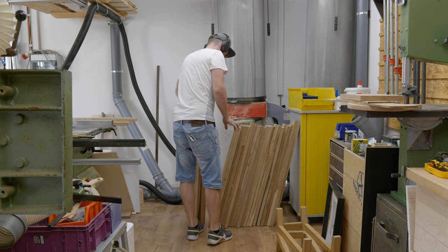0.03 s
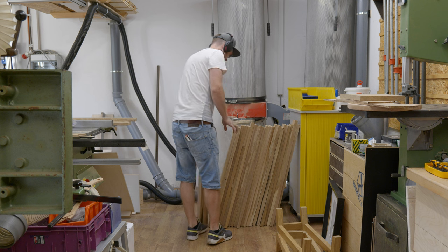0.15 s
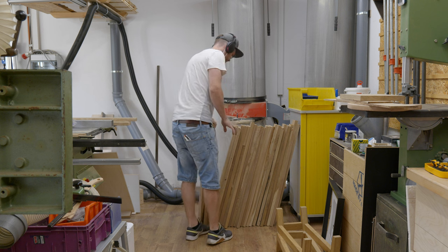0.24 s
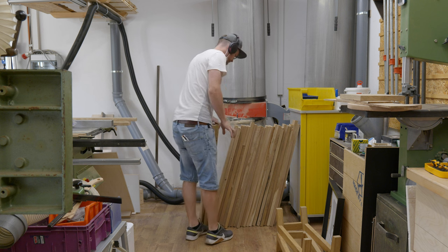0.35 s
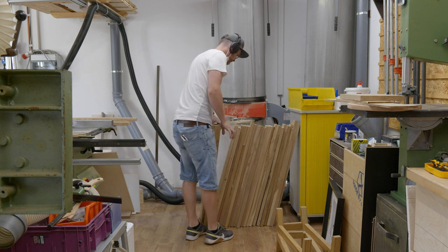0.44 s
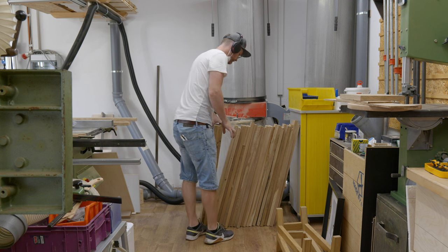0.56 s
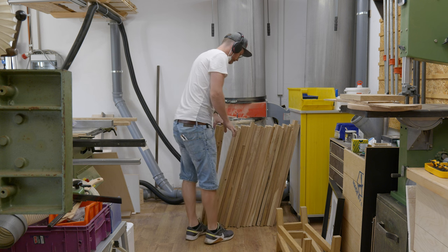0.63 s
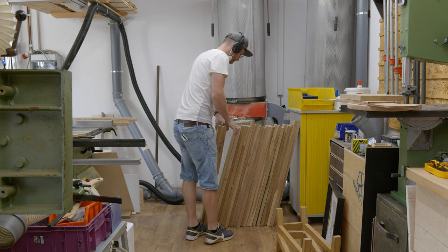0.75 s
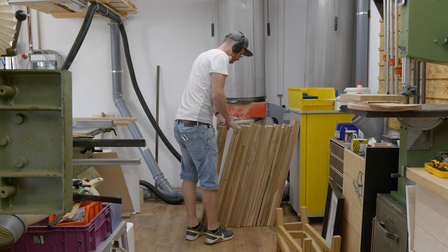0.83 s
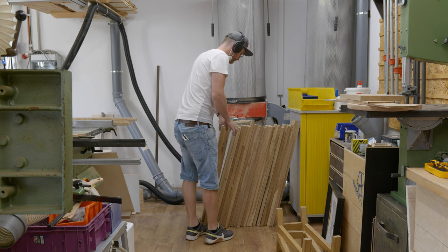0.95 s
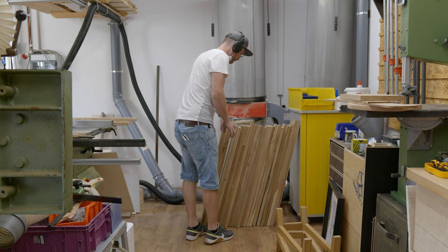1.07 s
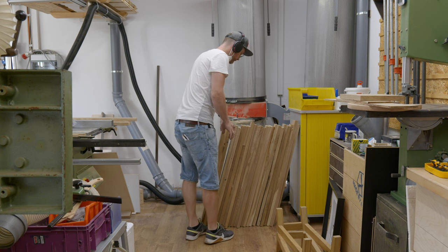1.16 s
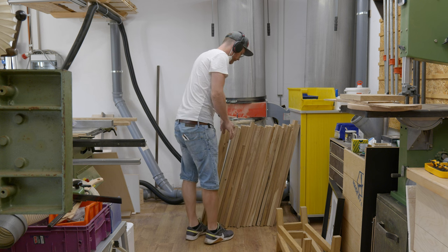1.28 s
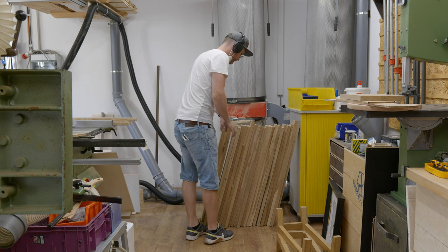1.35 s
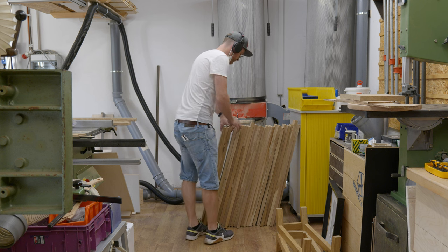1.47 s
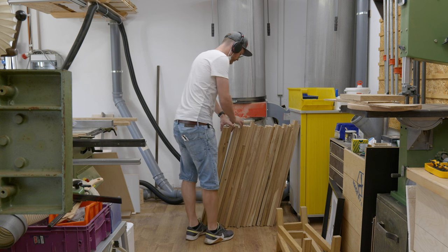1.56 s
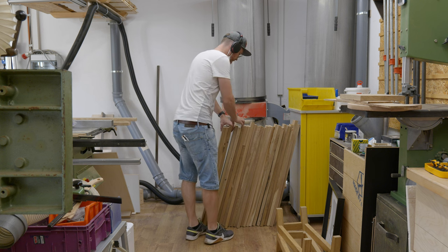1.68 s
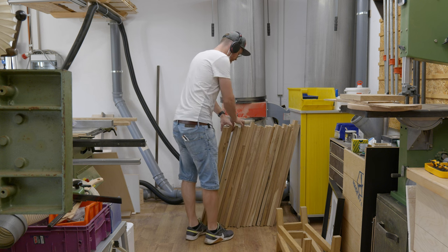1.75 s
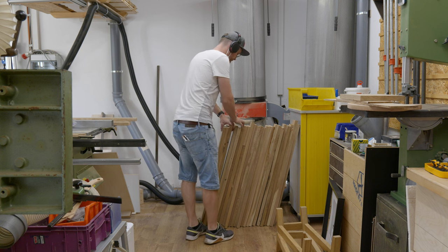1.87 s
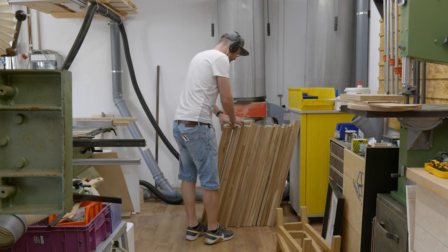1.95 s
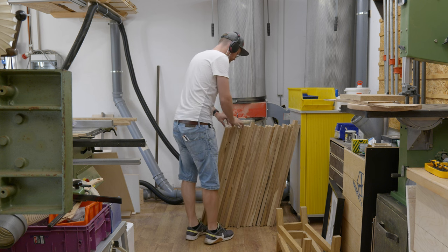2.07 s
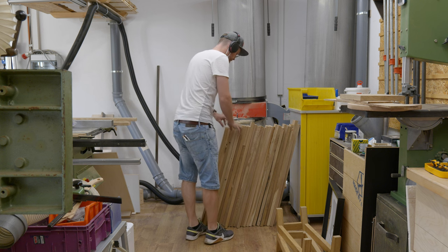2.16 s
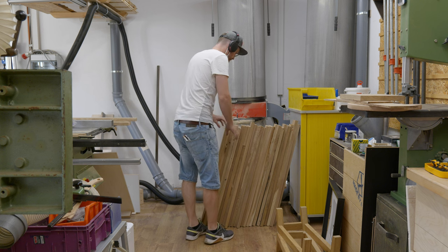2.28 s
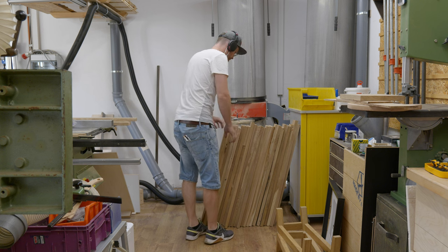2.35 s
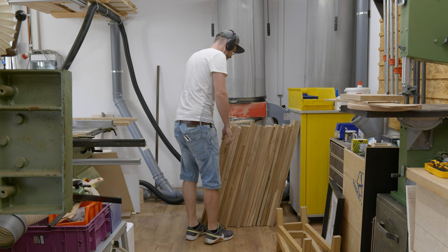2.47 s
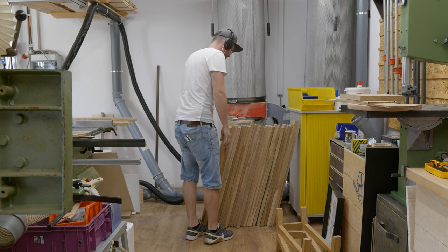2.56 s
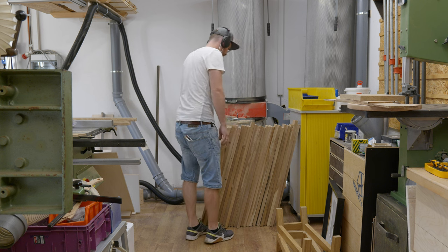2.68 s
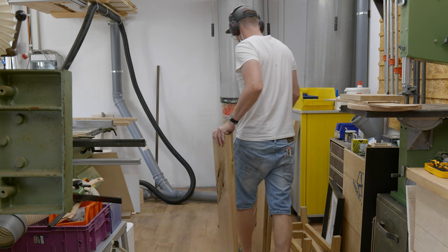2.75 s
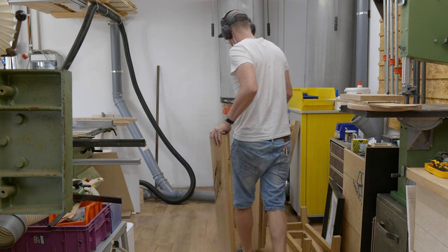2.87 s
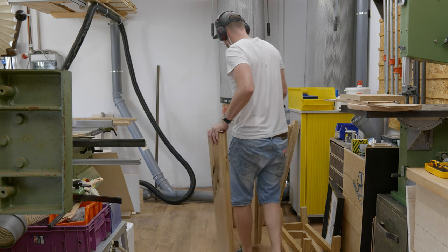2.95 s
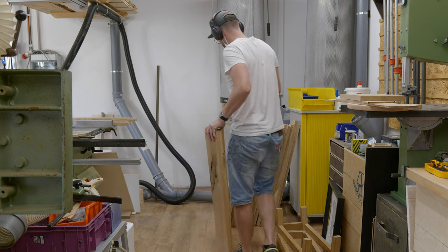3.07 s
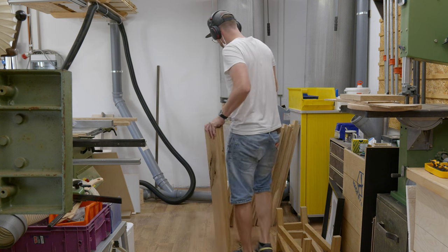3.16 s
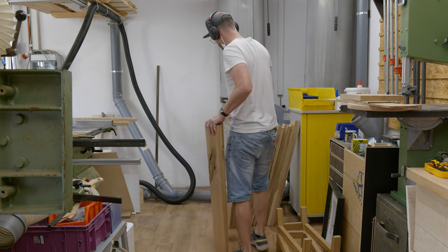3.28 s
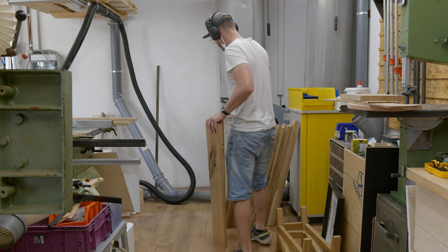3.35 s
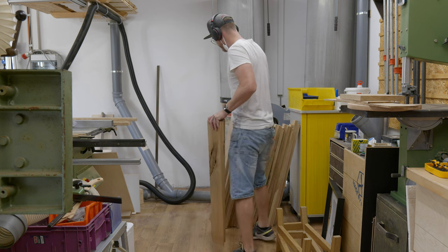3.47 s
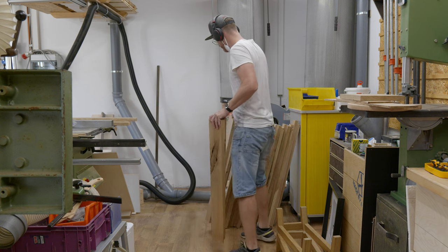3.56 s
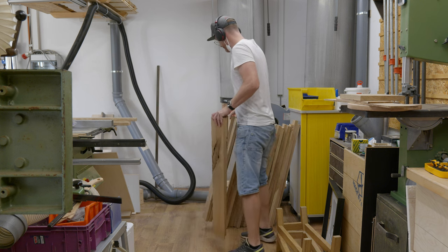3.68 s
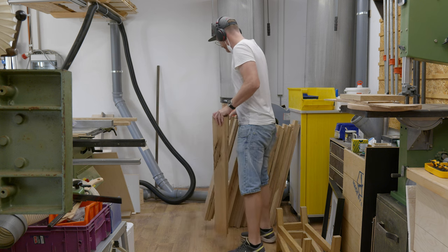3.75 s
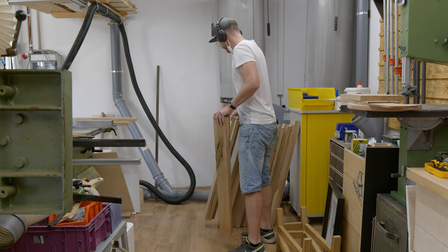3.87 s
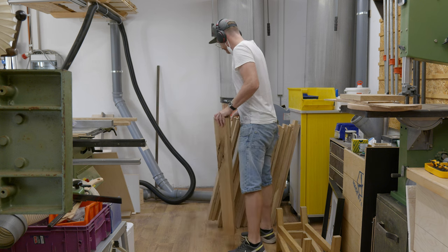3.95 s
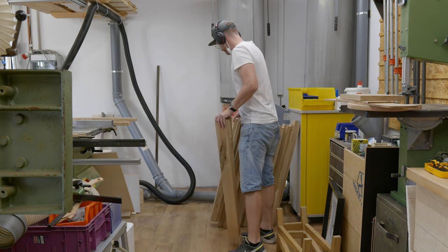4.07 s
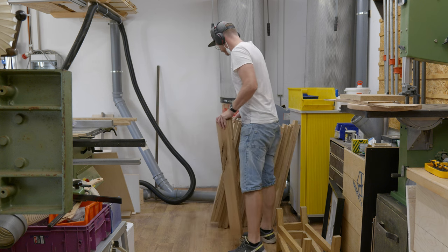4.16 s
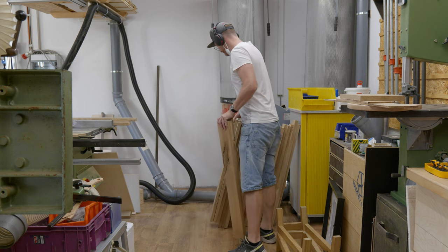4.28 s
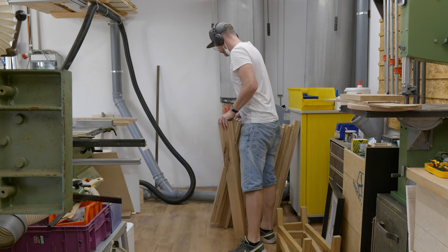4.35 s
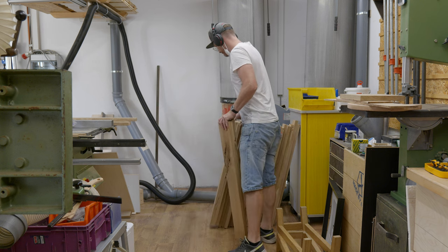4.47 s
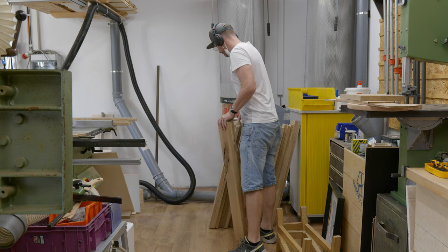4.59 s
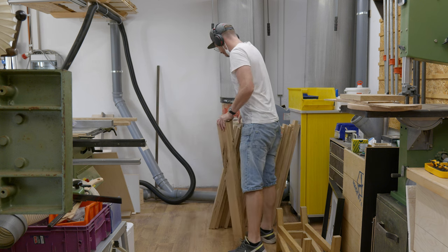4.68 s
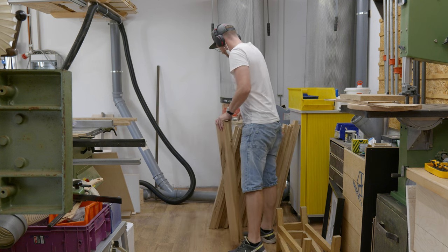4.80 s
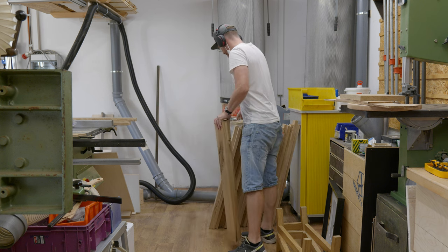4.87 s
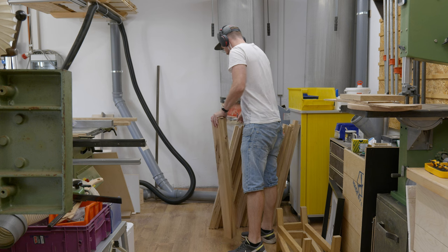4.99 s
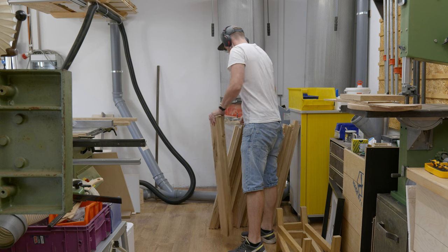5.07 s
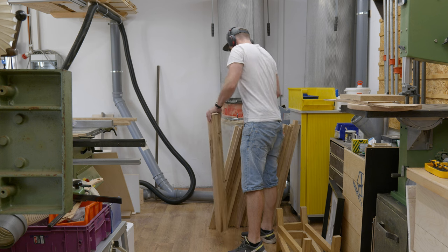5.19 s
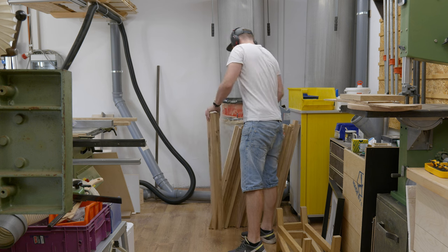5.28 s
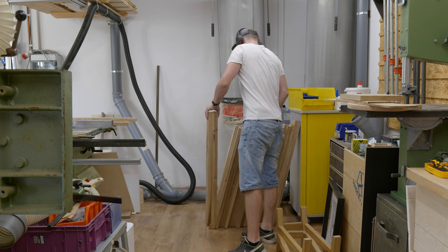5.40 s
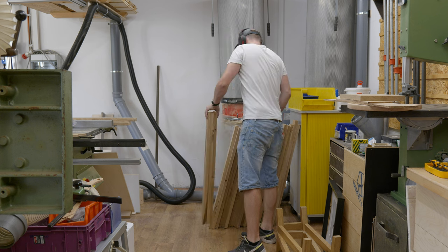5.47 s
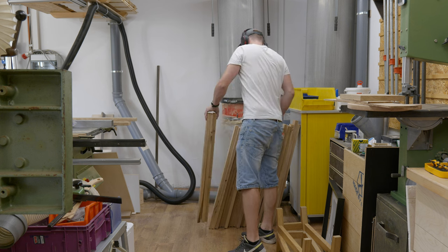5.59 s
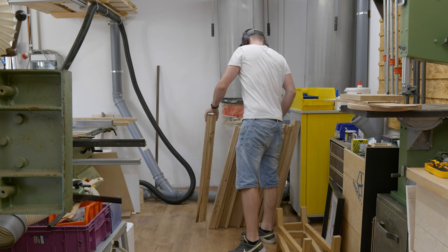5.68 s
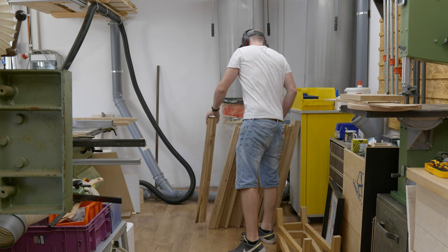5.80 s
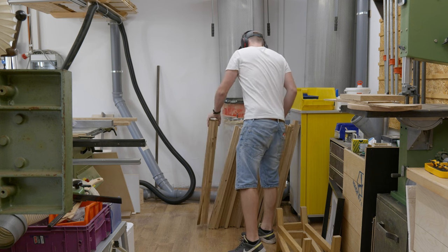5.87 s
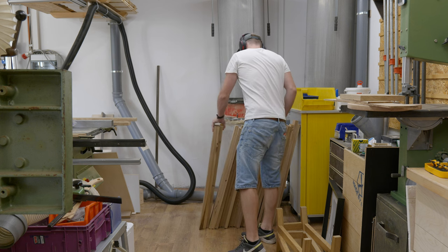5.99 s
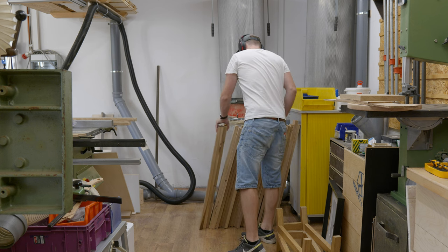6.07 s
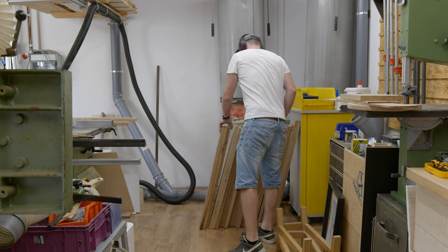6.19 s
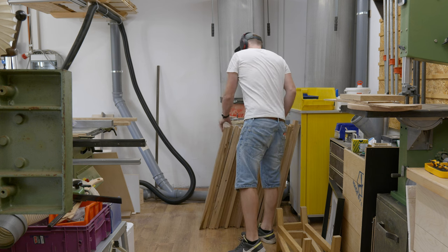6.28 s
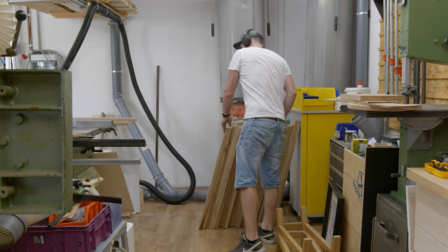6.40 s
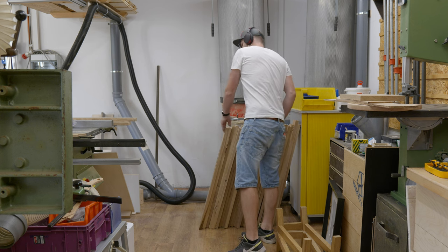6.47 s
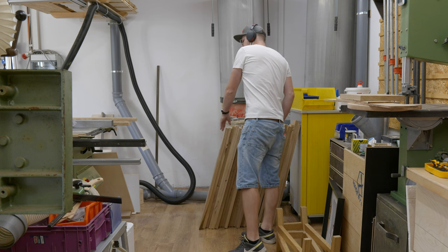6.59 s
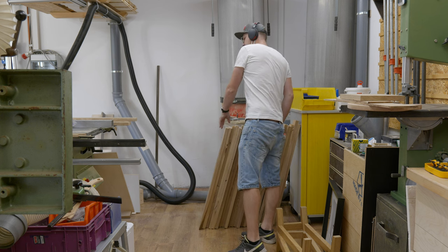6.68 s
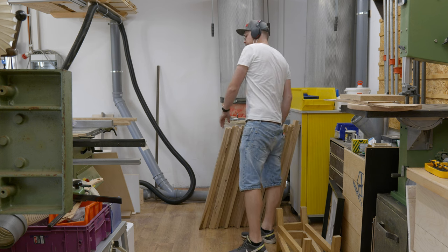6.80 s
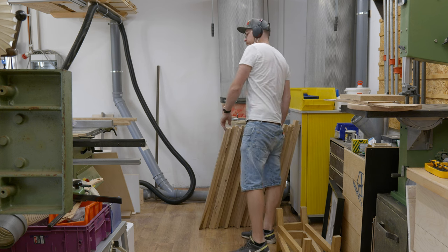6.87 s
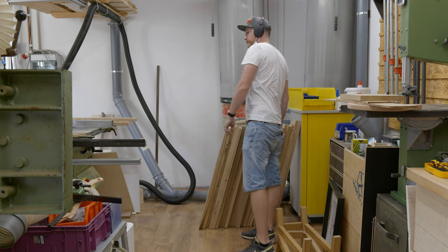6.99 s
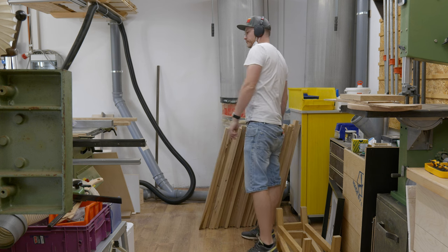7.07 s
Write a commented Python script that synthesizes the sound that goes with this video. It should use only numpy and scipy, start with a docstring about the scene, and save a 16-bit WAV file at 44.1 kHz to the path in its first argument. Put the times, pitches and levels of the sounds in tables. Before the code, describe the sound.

Wooden slats slide and knock as a stack is sorted by hand, building to loud sharp clatter in an echoing, hard-walled workshop.

```python
"""A hard-walled workshop, one microphone some metres from a stack of wooden slats being sorted by hand.
Over steady noise the slats slide from the start: tiny catches of the grain make a dry hiss. Sparse knocks
follow, ringing the slats and booming the plank floor; before 2 s the first stick-slip squeak sounds.
The knocks crowd together from 4 to 5 s, the loudest overloading the recorder; faint taps follow, then a last
loud group just after 6 s. Slides, knocks and squeaks are all drawn out by the room's dense tail."""
import sys
import numpy as np
from scipy import signal
from scipy.fft import rfft, irfft
from scipy.io import wavfile
from scipy.ndimage import uniform_filter1d

SR = 44100
rng = np.random.default_rng(int(sys.argv[2]) if len(sys.argv) > 2 else 0)


def store_pcm(level_fs):
    """Save levels as 16-bit WAV."""
    pcm = np.round(np.clip(level_fs, -1, 1) * 32767).astype(np.int16)
    wavfile.write(sys.argv[1], SR, np.atleast_2d(pcm).T)


N = 314853   # samples in the scene


def from_db(db):
    """Decibels to gain."""
    return 10 ** (np.asarray(db) / 20)


def rms_one(x):
    """Scale to rms 1."""
    return x / np.sqrt(np.mean(x ** 2) + 1e-20)


def at_hz(hz, points_hz, values):
    """Read a value between points on a log-frequency axis."""
    return np.interp(np.log(hz), np.log(points_hz), values)


def band(x, low_hz, high_hz):
    """Butterworth band-pass."""
    sos = signal.butter(2, [low_hz, high_hz], "band", fs=SR, output="sos")
    return signal.sosfilt(sos, x)


def ring(clicks, hz, t60):
    """A unit click sets a decaying sine of starting height 1 ringing; t60 is its time to fall 60 dB."""
    r = from_db(-60 / (t60 * SR))
    w = 2 * np.pi * hz / SR
    # the tiny offset keeps the filter from running into vanishing numbers
    return signal.lfilter([0, np.sin(w)], [1, -2 * r * np.cos(w), r * r], clicks + 1e-18)


# spectrum of the room and microphone noise: pitch_hz, level_db (per Hz, relative)
QUIET_SPECTRUM = [(15, -29), (25, 4.5), (49, 2), (153, 1), (427, -4), (591, -2.5), (659, -9.5), (863, -9.5),
                  (2350, -13), (3340, -11.5), (6380, -21), (14800, -23.5), (16000, -37)]
QUIET_DB = -62.5   # rms of the noise


def quiet():
    """Steady noise of the room and the microphone: white noise shaped in frequency."""
    hz = np.maximum(np.arange(N // 2 + 1) * SR / N, 1)
    shape = from_db(at_hz(hz, *np.transpose(QUIET_SPECTRUM)))
    noise = irfft(rfft(rng.standard_normal(N)) * shape, N)
    return from_db(QUIET_DB) * rms_one(noise)


# wood and soles sliding, one stroke a row: start_s (of full pressure), rise_s, hold_s, fall_s,
# rasp_db, body_db (over rasp), hiss_db (over rasp)
SLIDE_STROKES = [(0.0, .05, .17, .1, -57, -2, -24), (0.219, 0.083, .06, .1, -47.5, -3.5, -10),
                 (0.33, 0.045, .26, .08, -55.5, -8, -11), (0.897, 0.076, .07, .02, -70, -2, -26),
                 (1.825, 0.043, .02, .08, -63, -0.5, -30), (2.052, 0.3, .08, .03, -65, -4.5, -20),
                 (2.744, 0.068, .04, .02, -71, -2, -16), (2.827, 0.019, .04, .05, -40.5, -17, -9),
                 (2.9, .02, .08, .15, -56, -4, -14), (3.298, 0.046, .02, .1, -62, -3.5, -13),
                 (3.454, .04, .03, .2, -64, 0.5, -3), (3.586, 0.16, .04, .33, -46.5, -9, -17),
                 (4.44, .05, .02, .1, -66, 10.5, -17), (4.592, 0.13, .02, .01, -51, -1, -25.5),
                 (5.767, .05, .03, .25, -66, -19, -25), (6.397, .01, 0.018, 0.033, -55.5, -12, -1.5),
                 (6.783, 0.19, .05, .08, -70, -2.5, -21)]
STROKE_RANGE_DB = 20   # rise and fall are timed over this range
JUDDER_DB = 1.2   # rms: the contact grips and slips unevenly
FIDGET_DB = (-86, -78.5, -90)   # hands and slats never rest: rasp, body, hiss
FIDGET_SWING_DB, FIDGET_SMOOTH_S = 3, .04   # rms swing, averaging time


def pressure():
    """Rasp, body and hiss in time: the strokes rise, hold and fall over a faint restless background."""
    step_s = .002
    t = np.arange(0, N / SR + step_s, step_s)
    restless = uniform_filter1d(rng.standard_normal(len(t)), size=round(FIDGET_SMOOTH_S / step_s))
    fidget_db = np.add.outer(FIDGET_DB, FIDGET_SWING_DB * rms_one(restless))
    power = from_db(fidget_db) ** 2
    for s, rise, hold, fall, rasp_db, body_db, hiss_db in SLIDE_STROKES:
        before = np.maximum((s - t) / rise, 0)
        after = np.maximum((t - s - hold) / fall, 0)
        drop_db = STROKE_RANGE_DB * np.minimum(before + after, 8)
        power += from_db(rasp_db + np.c_[[0, body_db, hiss_db]] - drop_db) ** 2
    uneven = uniform_filter1d(rng.standard_normal(len(t)), size=8)
    judder = from_db(JUDDER_DB * rms_one(uneven))
    return [np.interp(np.arange(N) / SR, t, np.sqrt(row) * judder) for row in power]


def slides():
    """Dense tiny catches of the grain, heard in a low, a middle and a high range."""
    rasp, body, hiss = pressure()
    height = from_db(3.3 * rng.exponential(1, (3, N)))
    sign = rng.choice([-1, 1], (3, N))
    caught = rng.random((3, N)) < .2   # one sample in five
    catches = height * sign * caught
    # the rasp is lifted where the slats ring most freely
    middle = rms_one(band(catches[0], 1300, 5200)) + 0.25 * rms_one(band(catches[0], 3000, 3900))
    low = band(catches[1], 130, 1100)
    high = band(catches[2], 5400, 16000)
    return rasp * rms_one(middle) + body * rms_one(low) + hiss * rms_one(high)


# how long the workshop rings: pitch_hz, t60_s
ROOM_T60 = [(50, 0.76), (150, 0.81), (300, 0.65), (600, 0.59), (1200, 0.54), (2430, 0.59), (4500, 0.55),
            (7000, 0.5), (14000, 0.3)]
# tone of the tail at its start: pitch_hz, level_db
ROOM_COLOUR = [(50, -2.5), (200, -3), (400, -2), (800, 1.5), (2000, 2.5), (5000, -1), (8000, -2),
               (14000, -1)]
ROOM_DB, ROOM_BUILD_S = 3, 0.0037   # tail energy over the direct sound, time to build up
EARLY_DB, EARLY_S = 7, .02   # the near walls lift the start of the tail, a lift that fades


def workshop(x):
    """Direct sound, then a dense tail that builds up fast and dies band by band."""
    t = np.arange(SR) / SR
    edges = 35 * 2 ** np.arange(0, 9.1, .5)   # half-octave bands
    white = rng.standard_normal((2, SR))   # neighbouring bands take turns
    tail = 0
    for k, (low, high) in enumerate(zip(edges, edges[1:])):
        hz = np.sqrt(low * high)
        t60 = at_hz(hz, *np.transpose(ROOM_T60))
        colour_db = at_hz(hz, *np.transpose(ROOM_COLOUR))
        tail = tail + band(white[k % 2], low, high) * from_db(colour_db - 60 * t / t60)
    build_up = 1 - np.exp(-(t / ROOM_BUILD_S) ** 2)
    tail = tail * build_up * from_db(EARLY_DB * np.exp(-t / EARLY_S))
    response = from_db(ROOM_DB) * tail / np.sqrt(np.sum(tail ** 2))
    response[0] += 1   # direct sound
    return signal.fftconvolve(x, response)[:N]


PLACES = 3   # spots along the stack, each with its own path through the room


def struck(s, level_db):
    """One click per blow, each a little stronger or weaker than the rule, dealt in turn to the places."""
    clicks = np.zeros((PLACES, N))
    order = np.arange(len(s))
    place = (order + order // PLACES) % PLACES
    uneven_db = 1.5 * rng.standard_normal(len(s))
    clicks[place, np.round(s * SR).astype(int)] = from_db(level_db + uneven_db)
    return clicks


# knocks on the stack and floor: start_s, strength_db, pitch_hz (main), focus_db (lift around that pitch),
# brightness_db (per octave), tick_db (over the edge), thump_db (floor), loss_db (per rebound)
KNOCKS = [(0.232, -56, 250, 9, -2, -10, -58, 4), (0.299, -39.5, 790, 4.5, 1.5, 5, -57.5, 6),
          (0.971, -36.5, 248, 7.5, -0.9, -20, -61, 8), (1.146, -50.5, 514, 10, 7.5, -3, -57.5, 5.5),
          (1.199, -69, 291, 10, -8, -10, -71, 4), (1.491, -58.5, 1510, 4, 4.5, -12, -75, 12),
          (2.13, -29, 573, 4, -0.9, -3, -40, 6), (2.222, -61, 538, 24, 15, -30, -76, 6),
          (2.79, -44, 2220, -2, 6.5, -16, -88, 3), (2.796, -35.5, 2300, 6.5, 8.5, 0.5, -70, 13),
          (2.916, -37, 254, 1.5, -2.5, -3, -62.5, 12), (3.914, -59.5, 247, 9, 2, -30.5, -68, 6),
          (4.09, -22.5, 2100, 7, 4, -25, -54.5, 9), (4.096, -9.5, 3000, 5, 7, -22.5, -51, 7.5),
          (4.2, -25, 2570, 5.5, 3, -12, -50, 6.5), (4.432, -41, 217, 7, -4, -31, -64.5, 6.5),
          (4.618, -6, 1235, 6, 3, -7.5, -44, 5.5), (4.67, -14.5, 1170, 6, -0.2, -32.5, -48.5, 5.5),
          (4.714, -21, 1110, 7.5, 10.5, -15, -50, 11), (4.724, -9.5, 930, 6, 3.5, -42.5, -45, 6.5),
          (4.77, -15, 1040, 3, 2.5, -35.5, -39, 4), (4.819, -12.5, 1010, 2, 4.5, -37, -65, 4),
          (4.868, -22.5, 665, 3, 0.7, -20, -66, 7.5), (4.919, -26.5, 1640, 4.5, 1.1, -11, -48.5, 7.5),
          (5.385, -58.5, 1200, 5, 7.5, -15, -74, 4), (5.497, -57.5, 1620, 3, 8, -11, -83.5, 6),
          (5.592, -59, 2400, 6, 7.5, -27, -79.5, 5.5), (5.647, -55, 1875, 3.5, 7.5, -25, -74.5, 9),
          (5.7, -58.5, 1510, 1, 10.5, -32, -85, 7.5), (5.77, -56, 3030, 7, 6, -15.5, -77, 4),
          (6.013, -60, 1506, 5, 4.5, -11, -79, 8), (6.027, -21, 1740, 11.5, 0, -41.5, -41.5, 15),
          (6.071, -13.5, 1240, 6, 1.5, -12.5, -44.5, 7), (6.108, -30.5, 874, 12.5, 1, -32, -63.5, 11.5),
          (6.322, -24.5, 810, 7, 2, -15, -41, 8), (6.399, -18.5, 285, 7, -0.2, -18, -37, 8),
          (6.408, -31, 294, 10, -4, -22, -38, 18), (6.478, -50, 277, 4, 5, -4, -40.5, 4),
          (6.788, -65, 223, 6, 4, 2, -62, 8)]
REBOUND_S, REBOUND_TICK_DB = .011, -12   # mean gap; rebounds have less tick


def blows():
    """Every knock with its two weaker rebounds: time, strength, pitch, focus, brightness, tick."""
    s, strength, pitch, focus, brightness, tick, _, loss = np.array(KNOCKS).T[..., None]
    turn = np.arange(3)   # 0 is the knock itself
    rebound = turn > 0
    gaps = REBOUND_S * rng.uniform(.8, 1.2, (len(s), 3)) * rebound
    times = s + np.cumsum(gaps, axis=1)
    columns = times, strength - loss * turn, pitch, focus, brightness, tick + REBOUND_TICK_DB * rebound
    return [column.ravel() for column in np.broadcast_arrays(*columns)]


# what a slat rings with: pitch_hz, level_db, t60_s
SLAT_MODES = [(224.3, 1, 0.029), (288, -3.5, 0.13), (339, 2.5, 0.031), (480, 1, 0.036), (546, -2, 0.037),
              (769, 2, 0.013), (900, -2.5, 0.027), (992.4, 1.5, 0.01), (1190, -4, 0.016),
              (1381, 0.5, 0.0084), (1620, 1.5, 0.0077), (1910, 2, 0.009), (2240, -2.5, 0.0065),
              (2642, -1, 0.018), (2705, 2.5, 0.0064), (3245, 2, .009), (3360, 0.5, 0.014), (3750, 6, 0.004),
              (4462, 5.5, 0.0089), (4496, 8, 0.0048), (5570, 2.5, 0.0018), (6300, 4.5, 0.0037),
              (7500, -5, 0.0014), (9000, 0, 0.004), (11000, -8.5, 0.0022), (13800, -3, .0012)]
# an average blow before brightness and tick: pitch_hz, level_db
BLOW_COLOUR = [(400, -6), (1200, 0.5), (3200, -6.5), (5000, -5), (8000, -8), (14000, -12.5)]
FAVOURED_OCTAVES = 0.41   # width of the lift around a blow's main pitch


def knocks():
    """Slat on slat: each blow strikes all modes, neighbours in opposite sense, and favours those near its pitch."""
    s, strength, pitch, focus, brightness, tick = blows()
    out = 0
    for k, (hz, level_db, t60) in enumerate(SLAT_MODES):
        octaves = np.log2(np.clip(hz, 400, 3200) / 1200)
        tick_share = at_hz(hz, [3200, 8000, 14000], [0, 1, 1.3])
        colour_db = at_hz(hz, *np.transpose(BLOW_COLOUR)) + brightness * octaves + tick * tick_share
        lift_db = focus * np.exp(-(np.log2(hz / pitch) / FAVOURED_OCTAVES) ** 2)
        rung = ring(struck(s, strength + colour_db + lift_db + level_db), hz, t60)
        # wood is soft: little sounds far above or below the mode
        out = out + (-1) ** k * band(rung, hz / 2, min(2 * hz, .45 * SR))
    return out


# low modes of the plank floor and room: pitch_hz, level_db, t60_s
FLOOR_MODES = [(57, 4, 0.45), (65.2, -8, 0.47), (79.53, 5, 0.41), (102.8, -2.5, 0.32), (145.4, -2.5, 0.52),
               (158.8, 2.5, 0.28)]


def thumps():
    """The plank floor rings and drives the room's own low modes, so the boom swells before it dies."""
    s, *_, thump, _ = np.transpose(KNOCKS)
    out = 0
    for hz, level_db, t60 in FLOOR_MODES:
        clicks = struck(s, thump + level_db).sum(0)
        floor = ring(clicks, hz, t60)
        boom = ring(floor, hz, t60)
        # a unit click swells to a height of about 1
        out = out + boom * 2 * np.e * np.log(1000) / (t60 * SR)
    return out


# a slat sticking as it slides: start_s, length_s, first_hz, last_hz, level_db, overtones_db (over the tone)
SQUEAKS = [(1.829, 0.036, 1013, 972, -76.5, 16.5), (2.05, 0.05, 1600, 1540, -60.5, -24.5),
           (2.63, 0.154, 5220, 6320, -72, -34), (3.92, 0.23, 1740, 1770, -70, -27),
           (5.136, 0.056, 7000, 7300, -71.5, -28)]


def squeaks():
    """Stick-slip: a wavering tone with overtones that swells and fades."""
    out = np.zeros(N)
    for start, length, first_hz, last_hz, level_db, over_db in SQUEAKS:
        u = np.linspace(0, 1, int(length * SR))   # progress through the squeak
        wander = uniform_filter1d(rng.standard_normal(N // 10), size=100)[:len(u)]
        pitch_hz = (first_hz + (last_hz - first_hz) * u) * (1 + .3 * wander)
        phase = 2 * np.pi * np.cumsum(pitch_hz) / SR
        overtones = sum(np.sin(k * phase) for k in (2, 3, 4, 6) if k * last_hz < SR / 2)
        tone = np.sin(phase) + from_db(over_db) * overtones
        swell = np.sin(np.pi * u ** 0.52)
        i = int(start * SR)
        out[i:i + len(u)] += from_db(level_db) * swell * tone
    return out


MIC_LOW_HZ = 45   # the small microphone loses the bass below


def scene():
    """Handling sounds pass through the workshop; the floor booms and the steady noise are everywhere."""
    sliding = workshop(slides() + squeaks())
    knocking = sum(workshop(place) for place in knocks())
    handled = sliding + knocking + thumps()
    low_cut = signal.butter(2, MIC_LOW_HZ, "high", fs=SR, output="sos")
    return (signal.sosfilt(low_cut, handled) + quiet())[None]


CUTOFF_HZ = 16300   # nothing much is left above


def record(dry):
    """The recorder clips hard at full scale, then the top is cut."""
    clipped = np.clip(dry, -1, 1)
    top_cut = signal.cheby2(18, 60, CUTOFF_HZ, fs=SR, output="sos")
    return signal.sosfilt(top_cut, clipped)


dry = scene()
out = record(dry)
store_pcm(out)
```